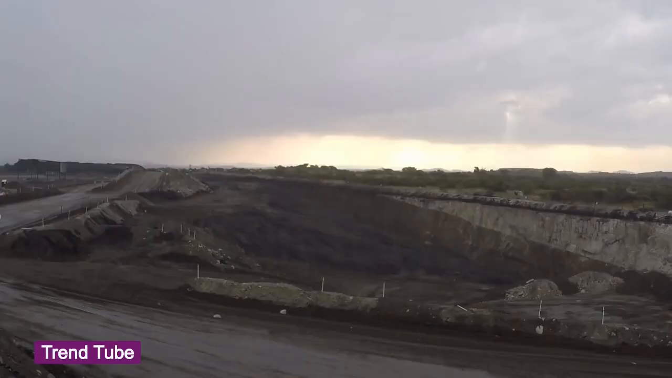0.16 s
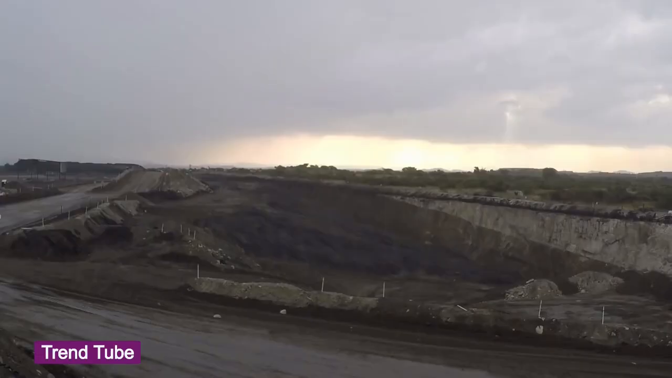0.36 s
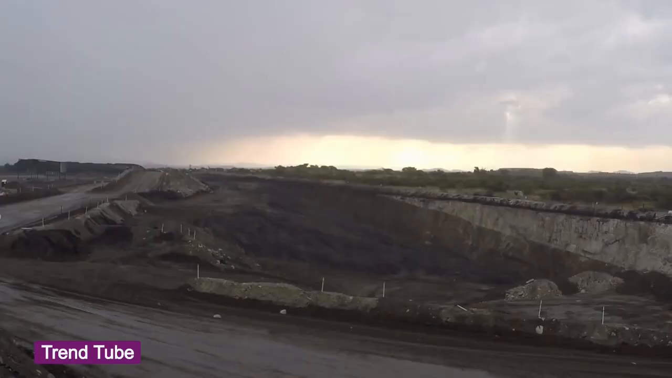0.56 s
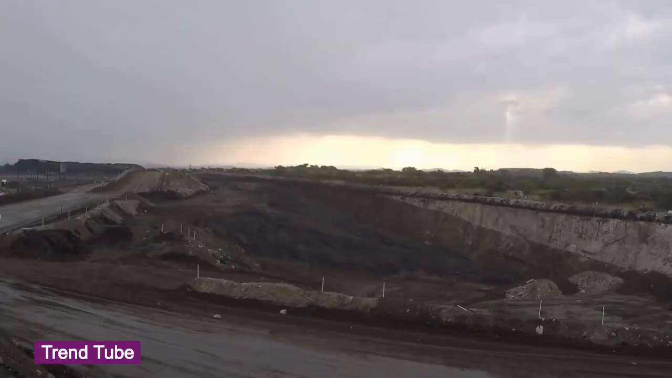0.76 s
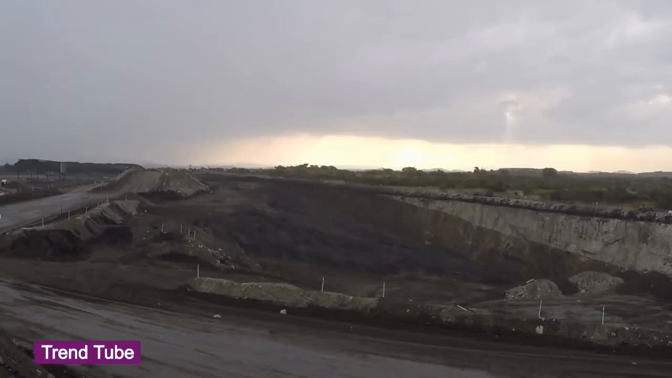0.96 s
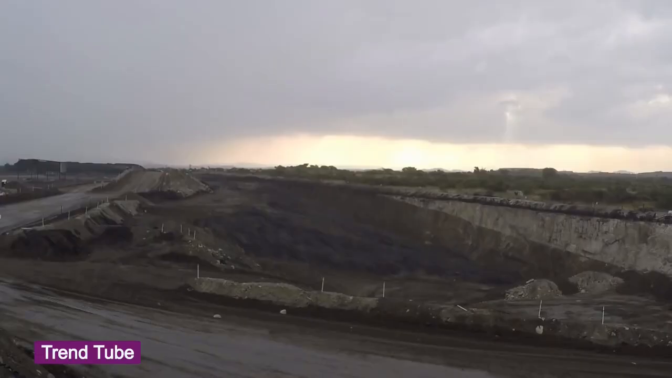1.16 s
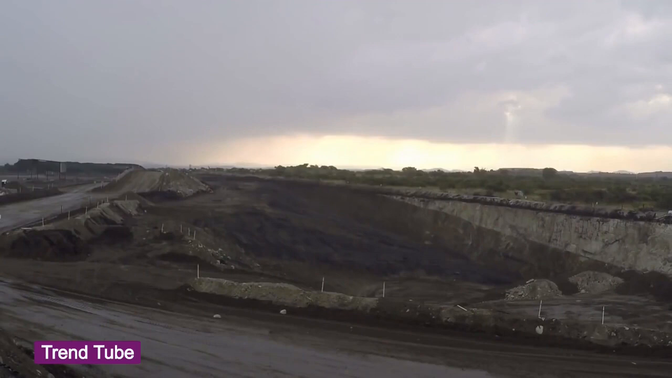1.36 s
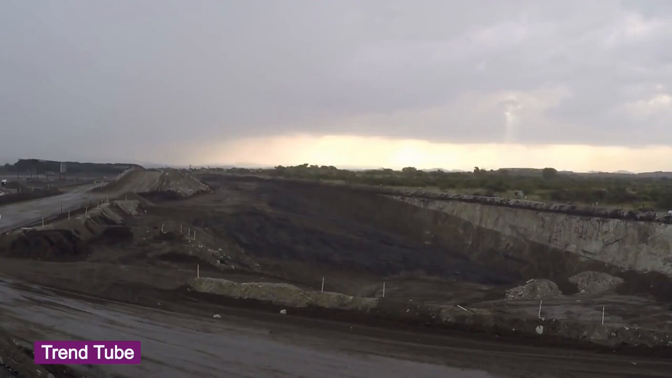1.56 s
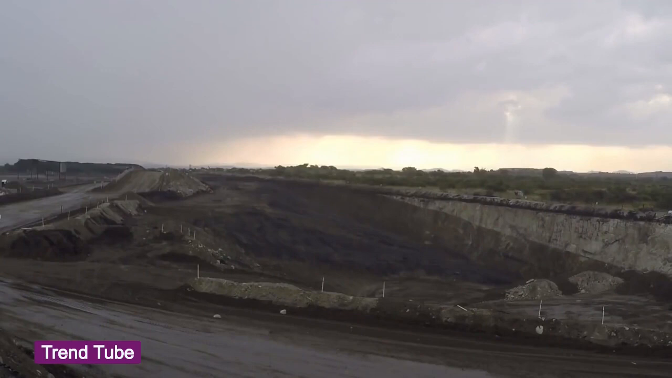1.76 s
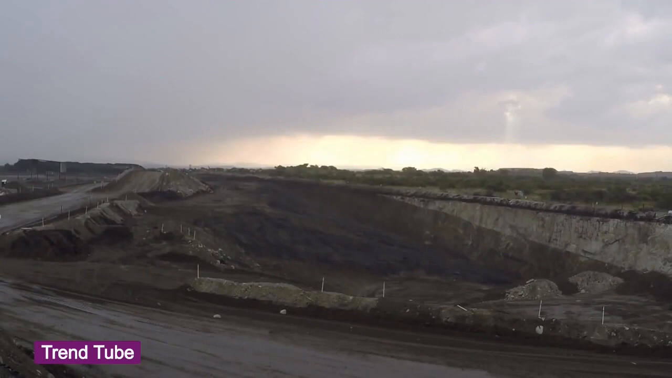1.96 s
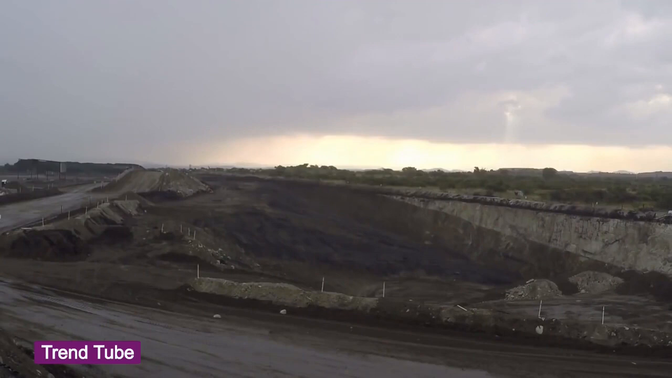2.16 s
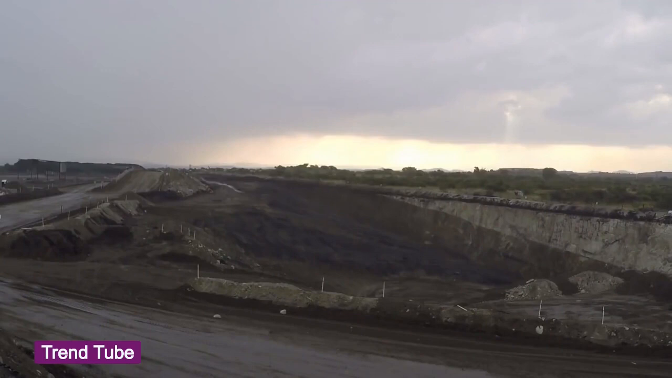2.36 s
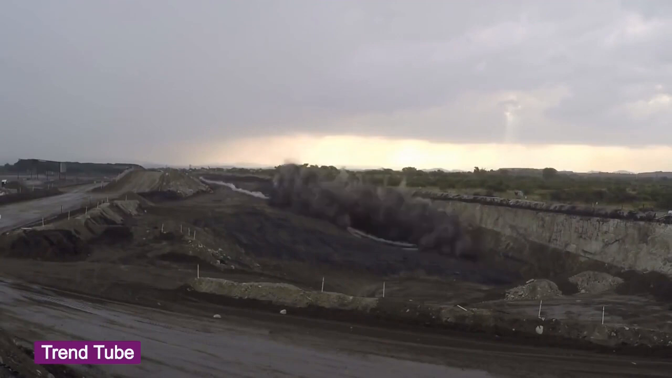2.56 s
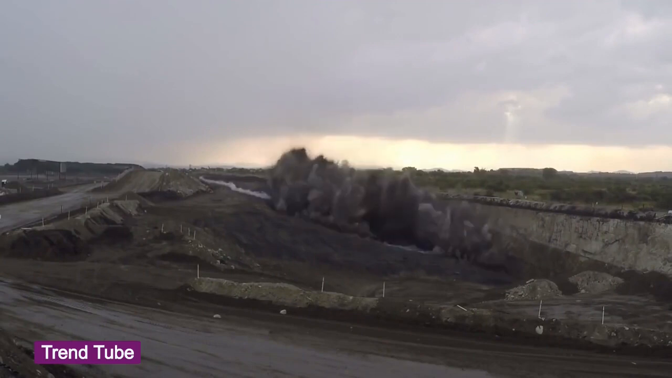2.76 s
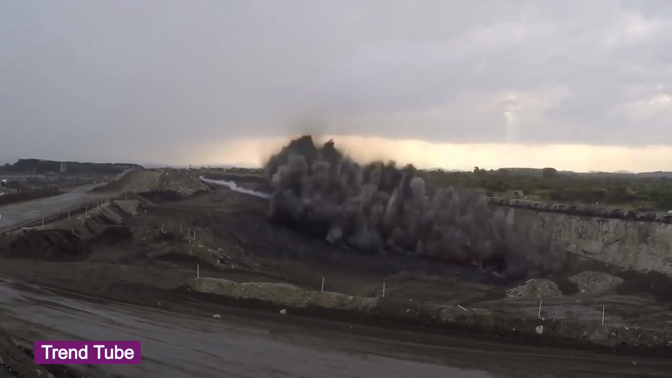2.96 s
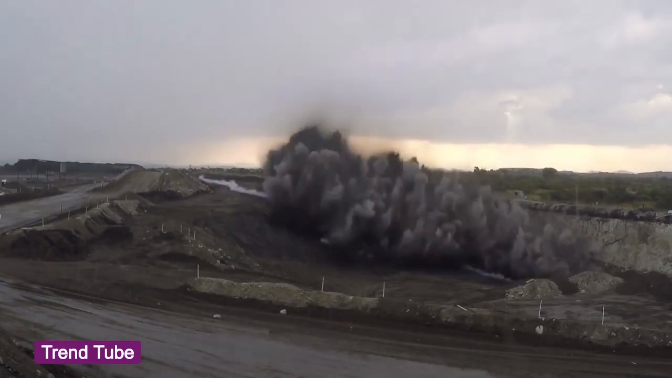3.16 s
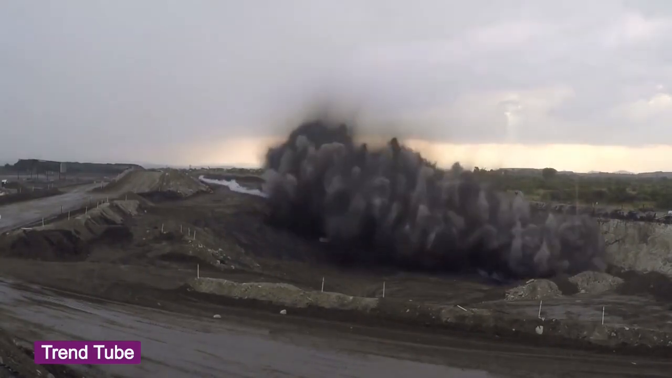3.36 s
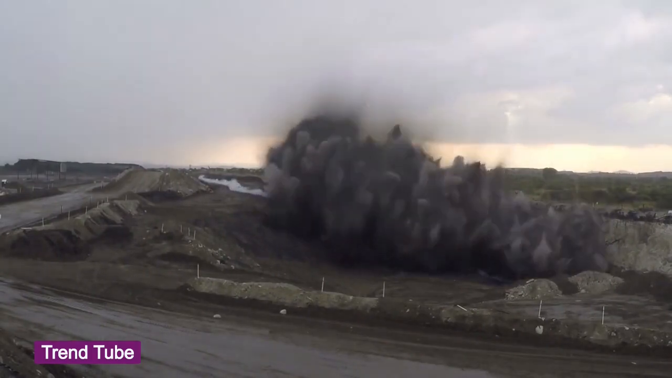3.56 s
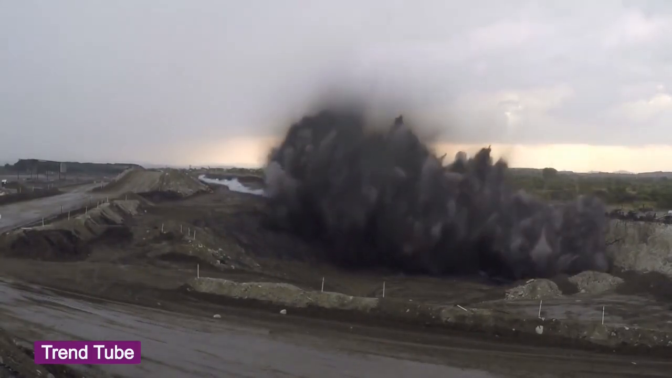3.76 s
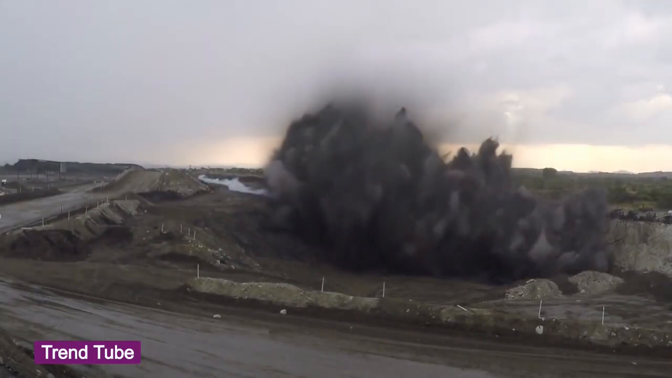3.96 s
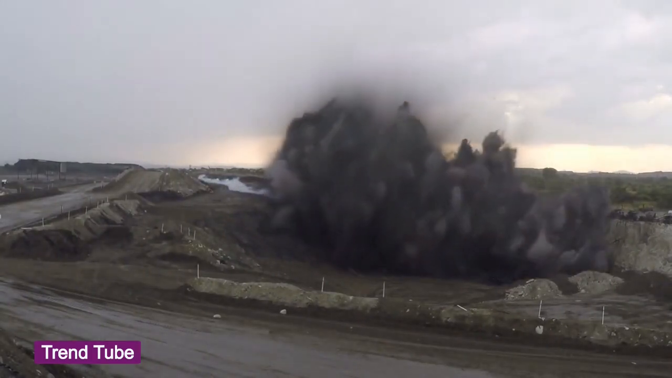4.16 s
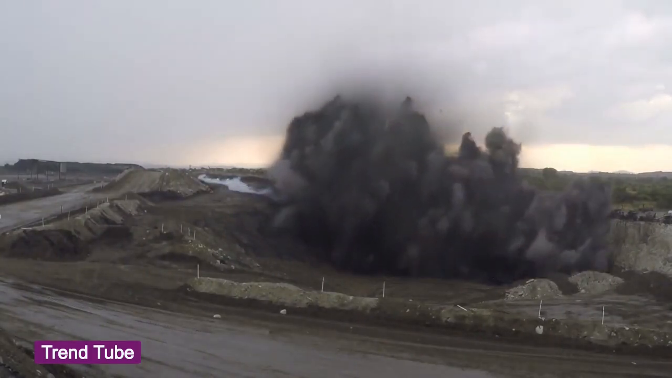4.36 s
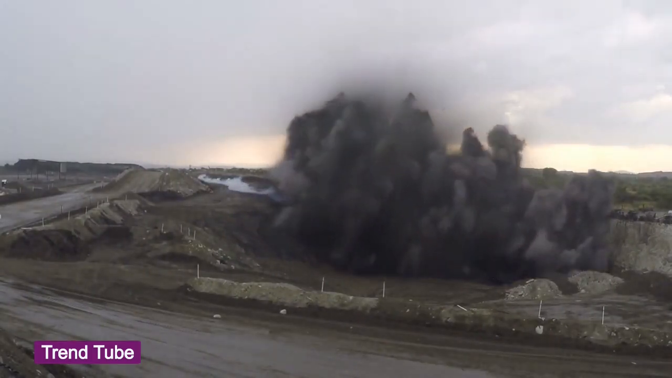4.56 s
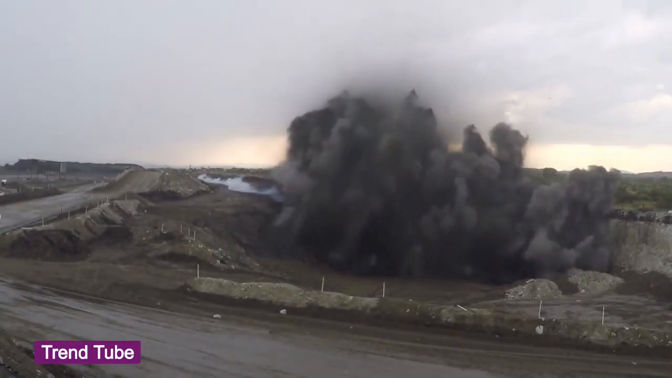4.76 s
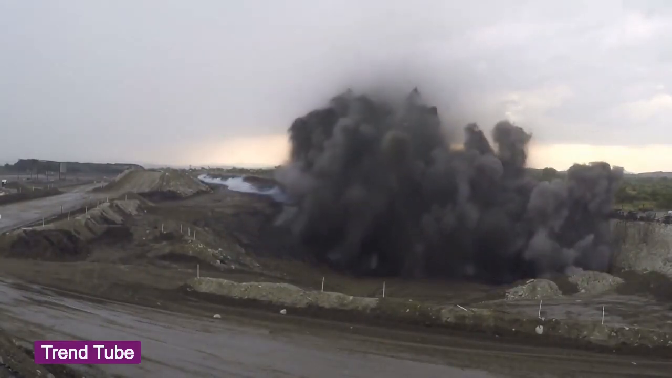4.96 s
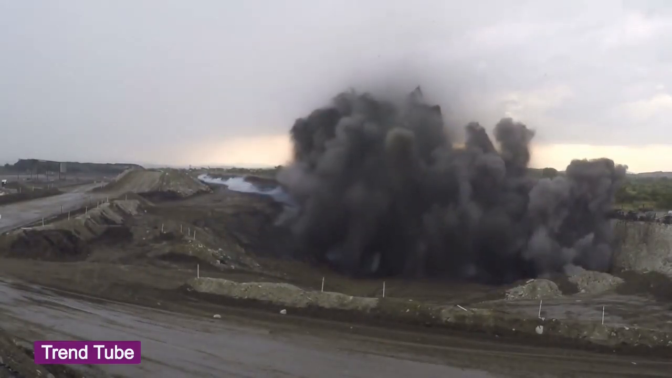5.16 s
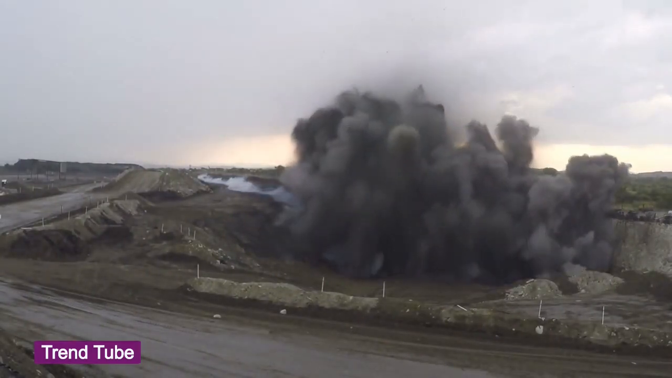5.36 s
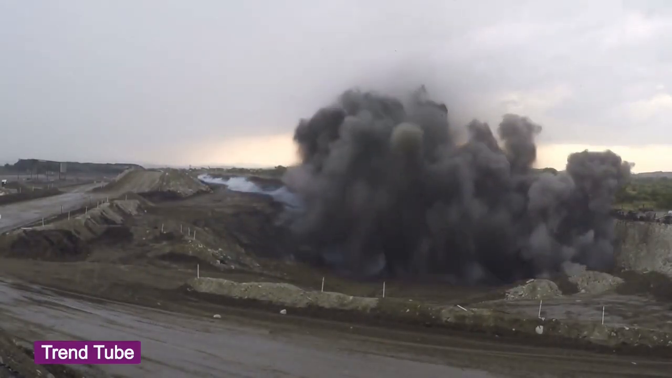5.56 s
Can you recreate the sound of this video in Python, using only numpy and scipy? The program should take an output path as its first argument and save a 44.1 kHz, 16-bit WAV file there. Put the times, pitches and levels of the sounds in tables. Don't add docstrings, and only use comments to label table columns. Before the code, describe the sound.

Quiet rain and plasticky drops, a sudden overloaded explosion chopped short, muffled rumble and rockfall, a hard housing rattle, then sparse drops.

```python
import sys
import numpy as np
from scipy import signal
from scipy.fft import rfft, irfft
from scipy.io import wavfile
from scipy.ndimage import uniform_filter1d

SR = 44100
rng = np.random.default_rng(int(sys.argv[2]) if len(sys.argv) > 2 else 0)


def makeup_ratio(level_db):
    decades = np.asarray(level_db, float) / 20
    return 10 ** decades


def master_out(mix):
    frames = np.transpose(np.atleast_2d(mix))
    ceiling = np.clip(frames, -1, 1)
    pcm = np.round(ceiling * 32767).astype(np.int16)
    wavfile.write(sys.argv[1], SR, pcm)


N = 247401

CUT_S = 2.5958
AIR_S, LOWEST_S = 3.08, 4.42
# (frequency [Hz], width [Hz], level [dB])
HOUSING = [(985, 150, -3), (1150, 200, -7.5), (1466, 210, -2.5), (1850, 128, -7), (2130, 170, -5.5),
           (2555, 157, 2.5), (2891, 190, 1.5), (3630, 120, 1), (4160, 180, -8.5), (4705, 224, -5.5),
           (5700, 330, -14), (6880, 500, -9), (8770, 760, -26)]
# (time [s], drive over input limit [dB], brightness [0-1], limit [dB])
BANG = [
    (2.355, -38.5, 0.8, -11.5),
    (2.383, -20.5, 0.45, -9.5),
    (2.3875, -4.5, 0.35, -8),
    (2.398, 7.5, 0.33, -10),
    (2.412, 12.5, 0.45, -11),
    (2.43, 9.5, 0.56, -9.5),
    (2.48, -0.5, 0.9, -10.5),
    (2.54, -8.5, 0.94, -8.5),
    (2.596, -14, 0.98, -7),
]
# (time [s], level [dB], snap re knock [dB])
RATTLE = [(3.0826, -12, -7), (3.0879, -13, -6), (3.0976, -19, -7), (3.1036, -14, -18), (3.1082, -25, -12),
          (3.1121, -31, -8), (3.1182, -30, -11), (3.1241, -18, -14), (3.1278, -23, -7), (3.1395, -14, -8),
          (3.1549, -16, -11), (3.1599, -16, -10), (3.164, -18, -15), (3.1728, -37, -5), (3.1809, -21, -10),
          (3.1836, -22, -13), (3.2033, -24, -10), (3.2072, -22, -11), (3.2148, -27, -11),
          (3.2192, -14, -11), (3.226, -29, -15), (3.2324, -31, -10), (3.2477, -36, -9), (3.2616, -21, -15),
          (3.2644, -22, -11), (3.2695, -23, -10), (3.2789, -18, -11), (3.2861, -27, -6), (3.296, -16, -10),
          (3.3001, -33, -4), (3.3032, -32, -11), (3.3234, -23, -9), (3.3386, -21, -9), (3.3555, -20, -10),
          (3.362, -24, -8), (3.376, -29, -14), (3.3804, -22, -11), (3.4058, -27, -9), (3.4095, -27, -7),
          (3.4131, -19, -10), (3.4178, -26, -11), (3.4325, -31, -8), (3.4378, -37, -8), (3.4458, -35, -5),
          (3.4541, -30, -7), (3.4693, -27, -12), (3.475, -26, -6), (3.4885, -17, -11), (3.4937, -28, -17),
          (3.5122, -30, -10), (3.5239, -23, -10), (3.5295, -16, -10), (3.5371, -33, -10),
          (3.5459, -23, -10), (3.5595, -35, -9), (3.5635, -34, -6), (3.569, -34, -8), (3.5826, -35, -9),
          (3.5901, -31, -12), (3.6032, -21, -13)]


def evened(x):
    return x / np.sqrt(np.mean(x ** 2) + 1e-20)


def read(points, hz):
    f, value = np.transpose(points)
    return np.interp(np.log(hz + 1), np.log(f + 1), value)


def curves(rows):
    s, *columns = np.transpose(rows)
    return [np.interp(np.arange(N) / SR, s, c) for c in columns]


def slow(shape):
    t = np.arange(0, N + 32, 32) / SR
    return np.interp(np.arange(N) / SR, t, shape(t))


def add(mix, s, sound):
    part = mix[round(s * SR):][:len(sound)]
    part += sound[:len(part)]


def colour(x, points):
    size = 2 ** 18
    gain = makeup_ratio(read(points, np.fft.rfftfreq(size, 1 / SR)))
    return evened(irfft(rfft(x, size) * gain)[:N])


def patchy(patch_db, flicker_db):
    a, b, patches = rng.standard_normal((N // 128 + 5, 257, 3)).T
    patches = uniform_filter1d(patches, size=6, axis=0)
    patches = evened(uniform_filter1d(patches, size=12, axis=1))
    flicker = rng.standard_normal(a.shape[1])
    z = (a + 1j * b) * makeup_ratio(patch_db * patches + flicker_db * flicker)
    return evened(signal.istft(z, nperseg=512, noverlap=384)[1][:N])


def grains(per_s, spread_db):
    size = makeup_ratio(spread_db * np.minimum(rng.exponential(1, N), 4))
    return rng.standard_normal(N) * size * (rng.random(N) < per_s / SR)


def resonate(x, hz, width):
    turn = np.exp(2j * np.pi * np.cumsum(hz * np.ones(len(x))) / SR)
    r = np.exp(-np.pi * width / SR)
    return 2 * (turn * signal.lfilter([1 - r], [1, -r], x / turn)).real


def resonate_twice(x, hz, width):
    return resonate(resonate(x, hz, width), hz, width)


def rain():
    # (frequency [Hz], density [dB per Hz])
    wash_spectrum = [(15, -37), (25, 0.5), (76, -10.5), (217, -7), (301, -8), (416, -2.5), (1040, -5.5),
                     (1290, -4.5), (1400, -6.5), (1650, -6), (2840, -12.5), (6740, -20.5), (13600, -36.5),
                     (16000, -45.5)]
    # (time [s], level [dB])
    rain_level = [(0.0, -41), (2.24, -41), (2.37, -41)]
    # (frequency [Hz], side minus mid [dB])
    side_spectrum = [(30, -19), (900, -46), (3500, -40), (4300, -31.5), (7000, -31.5), (9000, -22),
                     (13000, -9), (16000, -4)]
    # (time [s], peak [dB], frequency [Hz])
    splashes = [(0.16, -28.5, 7360), (0.1894, -35, 6290), (0.3996, -30.5, 6300), (0.4668, -33.5, 7290),
                (0.5484, -33, 9200), (0.9522, -31, 7500), (1.0944, -36, 6640), (1.4074, -32.5, 6340),
                (1.5304, -35, 7250), (1.6844, -33, 7880), (1.7887, -27, 5960), (1.9444, -32.5, 7100),
                (2.2129, -33, 6070), (2.3105, -23.5, 6500), (2.3461, -32, 6760)]
    # (time [s], peak [dB], frequency [Hz], length [s])
    puffs = [
        (.57, -45, 135, .03),
        (.71, -43, 118, .035),
    ]
    # (frequency [Hz], level [dB], rate [beats per s], first beat [s])
    machine = (1298, -45, 6.24, .0723)

    wash = colour(patchy(1.5, 0.41), wash_spectrum)
    burst = np.exp(-np.arange(600) / 130) * rng.standard_normal(600)
    fine = signal.oaconvolve(grains(60, 4.), burst)[:N]
    spatter = colour(.5 * evened(fine) + patchy(5., 1.2),
                     [(2000, -32), (4500, -3.5), (8000, 7), (12000, -7), (16000, -6.5)])
    side = colour(patchy(4., 2.5), [(hz, read(wash_spectrum, hz) + db) for hz, db in side_spectrum])

    near = np.zeros(N)
    decay = np.exp(-np.arange(900) / 160)
    for (s, db, hz), noise in zip(splashes, rng.standard_normal((len(splashes), 900))):
        add(near, s, makeup_ratio(db - 10.0) * evened(resonate_twice(noise, hz, 4000)) * decay)
    t = np.arange(N) / SR
    for s, db, hz, length in puffs:
        near += makeup_ratio(db) * np.sin(2 * np.pi * hz * t) * np.exp(-((t - s) / length) ** 2)

    hz, db, per_s, first = machine
    beats = makeup_ratio(db) * np.sin(2 * np.pi * hz * t) * np.cos(np.pi * per_s * (t - first)) ** 10
    level = makeup_ratio(curves(rain_level)[0] + 0.62)
    return level * (wash + makeup_ratio(-22) * spatter + makeup_ratio(-29.0) * side * [[1], [-1]]) + near + beats


def tap(low_hz, high_hz, high_db, tick_db, focus, damp, scatter_db, chance):
    t = np.arange(2600)[:, None] / SR
    hz, width, db = np.transpose(HOUSING)
    count = len(hz)
    near = makeup_ratio(-focus * abs(np.log2(hz / low_hz))) + makeup_ratio(high_db - focus * abs(np.log2(hz / high_hz)))
    weight = near * makeup_ratio(.4 * db + scatter_db * chance[:count])
    long_gain = makeup_ratio(-23.5 - 8.8 * (hz > 3000) + 3.5 * chance[20:20 + count])
    decay = np.exp(-np.pi * damp * (width + 120) * t)
    decay = decay + long_gain * np.exp(-np.pi * .3 * (width + 80) * t)
    modes = (weight * decay * np.sin(2 * np.pi * hz * t + 1.654 * chance[-count:])).sum(1)

    t = t[:, 0]
    spot = np.sin(2 * np.pi * low_hz * t) + makeup_ratio(high_db) * np.sin(2 * np.pi * high_hz * t)
    modes += 0.97 * spot * np.exp(-t / 0.0019)
    modes += makeup_ratio(-9.0) * np.sin(2 * np.pi * 1050 * t) * np.exp(-t / 0.0018)
    lid = np.sin(2 * np.pi * 2740 * t) + 0.52 * np.sin(2 * np.pi * 1860 * t)
    modes += makeup_ratio(-22.5) * lid * np.exp(-t / 0.0089)

    tick = resonate(resonate(np.resize(chance, len(t)), 5000, 8000), 4700, 8200) * np.exp(-t / 0.001)
    blow = (modes / abs(modes).max() + makeup_ratio(tick_db) * tick) * np.minimum(t / 0.00051, 1)
    return signal.sosfilt(signal.butter(3, 420, "high", fs=SR, output="sos"), blow)


def drops():
    # (time [s], peak [dB], low ring [Hz], high ring [Hz], high ring re peak [dB])
    heavy = [(0.099, -10.5, 2000, 4090, -3.5), (0.985, -11.5, 1980, 2600, -3), (1.788, -25, 1320, 2930, 0),
             (1.84, -18, 1300, 2750, 1), (1.959, -7.5, 1918, 2400, -42), (2.091, 1, 2420, 3460, -13),
             (2.609, -12.5, 1810, 2400, -25), (2.619, -17.5, 1400, 2950, -23.5),
             (2.622, -15, 1120, 2390, -5), (2.683, -32, 1888, 2370, -36.5), (2.899, -1.5, 2820, 3760, -3),
             (3.953, -32.5, 2197, 2400, -31), (4.121, -21, 1990, 2695, -6), (4.459, -25, 2130, 2850, -23),
             (4.57, -13.5, 1880, 3920, -2), (4.677, -32, 2260, 2775, -20),
             (5.064, -32.5, 2020, 2840, -15.5), (5.136, -10, 1920, 2540, -26),
             (5.199, -20.5, 1716, 2760, -48), (5.5, -9.5, 1150, 2676, 9.5), (5.507, -20.5, 2330, 4000, -1),
             (5.579, -23.5, 2303, 2816, -13)]
    # (time [s], peak [dB], ring [Hz], tick re peak [dB])
    light = [(1.26, -28, 3700, -23), (2.651, -48, 955, -33), (2.744, -44, 790, -22),
             (2.759, -42.5, 804, -26.5), (2.772, -41, 850, -21.5), (2.98, -38.5, 1240, -33.5),
             (3.961, -38.5, 1859, -19.5), (4.176, -39.5, 2173, -29), (4.27, -53, 1722, -3),
             (4.344, -47.5, 1184, -13), (4.393, -37, 1886, -15), (4.448, -43, 3630, -26),
             (4.486, -37.5, 1940, -37), (4.763, -44, 2280, -34), (4.952, -40, 915, -30),
             (5.151, -34, 1900, -21), (5.215, -42, 1761, -33), (5.372, -37, 1890, -32),
             (5.483, -41, 2950, -25)]
    # (time [s], peak [dB], frequency [Hz], t60 [s])
    drips = [(2.804, -48, 531, 0.066), (2.801, -55.5, 1850, 0.038), (2.846, -58.5, 1850, 0.028),
             (2.877, -53, 927.6, 0.055), (3.003, -50, 538, .07), (3.002, -63, 1654, 0.0386),
             (3.04, -60, 1754, 0.042), (3.742, -44.5, 1564, 0.0254), (4.535, -63, 530, 0.064),
             (4.955, -57, 895, 0.093), (5.02, -53, 1920, 0.0266), (5.114, -48.5, 910, 0.018),
             (5.228, -55, 1490, 0.035), (5.35, -43, 1150, 0.02), (5.367, -47.5, 688, 0.0218),
             (5.562, -51.5, 1808, .04)]
    heavy_tick_db, light_high_hz, light_high_db = -26, 2760, -13.5

    out, t = np.zeros(N), np.arange(4000) / SR
    rows = [(*row, heavy_tick_db) for row in heavy]
    rows += [(s, db, hz, light_high_hz, light_high_db, tick_db) for s, db, hz, tick_db in light]
    for (s, db, low_hz, high_hz, high_db, tick_db), chance in zip(rows, rng.standard_normal((len(rows), 200))):
        blow = tap(low_hz, high_hz, high_db + 4.5, tick_db + 4, 10.0, 1.13, 0.38, chance)
        add(out, s + 0.00051, makeup_ratio(db) * blow)
    for (s, db, hz, t60), noise in zip(drips, rng.standard_normal((len(drips), len(t)))):
        hum = np.sin(2 * np.pi * hz * t) + 0.9 * evened(resonate_twice(noise, hz, .3 * hz))
        add(out, s, makeup_ratio(db - 60 * t / t60) * hum * np.minimum(t / 0.0013, 1))
    return out


def bang():
    # (frequency [Hz], density [dB per Hz])
    dull_spectrum = [(60, -25), (200, -17.5), (390, 6), (700, -9), (1400, -3), (3000, -22.5), (8000, -31),
                     (16000, -37.5)]
    bright_spectrum = [(35, -68), (60, -45), (238, -21), (389, -3.5), (579, -6), (842, -0.5), (1170, -11.5),
                       (1550, -4.5), (6740, -11.5), (10500, -25), (16000, -40)]
    # (time [s], strength over input limit [dB], length [ms])
    shocks = [
        (2.384, 8.5, .8),
        (2.3867, 6.5, .6),
        (2.3887, 7.5, .7),
        (2.3915, 7.5, .9),
        (2.394, 8.5, .8),
        (2.3954, 12, .9),
    ]

    now = np.arange(N) / SR
    drive_db, bright, limit_db = curves(BANG)
    bright = np.clip(bright, 0, 1)
    roar = (1 - bright) * colour(patchy(1.8, 2.0), dull_spectrum)
    roar = roar + bright * colour(patchy(1.4, 1.5), bright_spectrum)
    roar *= makeup_ratio(drive_db) / np.hypot(bright, 1 - bright) * (np.arange(N) > BANG[0][0] * SR)
    t = np.arange(-20, 400) / SR
    for s, db, ms in shocks:
        pulse = (1 - 300 * t / ms) * np.exp(-1000 * t / ms)
        add(roar, s + t[0], makeup_ratio(db) * np.where(t < 0, -.6, pulse))

    apart = colour(rng.standard_normal(N),
                   [(100, 5), (1000, -1), (2200, -5), (4500, 2), (7000, -0.5), (14000, -4)])
    apart *= makeup_ratio(-22) * np.exp(-np.maximum(now - shocks[0][0], 0) / .02) * np.minimum(makeup_ratio(drive_db), 1)
    flat = np.tanh(roar) + apart * [[1], [-1]]

    dark = np.interp(now, (2.49, 2.535, 2.565, 2.59), [0, 1, 1, .8])
    low_pass = signal.butter(14, 13400, fs=SR, output="sos")
    flat = (1 - dark) * flat + dark * signal.sosfiltfilt(low_pass, flat)
    droop = np.exp(-2 * np.pi * 25 / SR)
    return makeup_ratio(limit_db) * signal.lfilter([1, -1], [1, -droop], flat)


def aftermath():
    # (at cut [dB], lull [dB], shaking [dB], fading [dB per s], at lowest gain [dB])
    layers = [
        (-43.5, -77.5, -42, 45, -73.5),
        (-63, -98, -61, 84, -97),
        (-53, -66.5, -45.5, 76, -87),
        (-53.5, -62, -52, 35.5, -80),
    ]
    creep = [18.7, 20, 14, 8.5]
    follow = [0.37, 0.38, 0.55, 0.227]
    still_s, cut_tail_s, shake_s = 3.58, 0.044, 0.016

    t = np.arange(N) / SR
    knocks = slow(lambda u: sum(makeup_ratio(2 * db) * (u > s) * np.exp(-abs(u - s) / shake_s) for s, db, _ in RATTLE))
    shake_db = np.where(t < still_s, 10 * np.log10(knocks + 0.00026) + 25, 0)
    for (cut_db, lull_db, top_db, fade_db, low_db), creep_db, share in zip(layers, creep, follow):
        lull = makeup_ratio(lull_db) + makeup_ratio(cut_db - 30 * (t - CUT_S) / cut_tail_s)
        blast = makeup_ratio(top_db + share * shake_db - fade_db * np.maximum(t - still_s, 0))
        blast = blast + makeup_ratio(low_db + creep_db * (t - LOWEST_S))
        yield np.where(t < AIR_S, lull, blast) * (t > CUT_S)


def fall():
    # (frequency [Hz], density [dB per Hz])
    rock_spectrum = [(130, -46.5), (220, -5.5), (477, -3.5), (712, -8), (903, -4.5), (1150, -34),
                     (1300, -37), (1690, -50), (2860, -120)]

    grit_gain, treble_gain, rock_gain, deep_gain = aftermath()
    t = np.arange(N) / SR
    shaking = np.interp(t, [3.6, 3.75], [.6, .15])
    drive = (patchy(0.89, 1.6) + shaking * evened(grains(370, 1.3))) / np.hypot(1, shaking)
    dull = colour(patchy(5., 4.1), [(2500, -5.5), (3500, -18), (16000, -28)])
    murmur = np.where(t < AIR_S, dull, drive)
    echo_db = np.interp(t, [3.55, 3.7, 4.15, 4.3], [11.0, 12.5, 4, 1.8])
    far_db = 4. * np.clip(t - LOWEST_S, 0, 1)
    grit = 0
    for k, (hz, width, db) in enumerate(HOUSING[:11]):
        ring = resonate(resonate(murmur, hz, 2.2 * width), hz, 4.3 * width)
        mode_db = db + echo_db * (1700 < hz < 2000) + far_db * (hz > 3000)
        grit = grit + (-1) ** k * makeup_ratio(mode_db) * ring

    treble = colour(drive, [(3000, -26), (5500, 7.5), (8000, 2.5), (11000, -14), (14000, -21), (16500, -38)])
    settled = np.interp(t, (3.62, 3.74), [0, 1])
    low_pass = signal.butter(6, 9500, fs=SR, output="sos")
    treble = (1 - settled) * treble + settled * signal.sosfilt(low_pass, treble)
    rock = colour(patchy(2.6, 3.0), rock_spectrum)
    deep = colour(patchy(3., 3.), [(60, -28), (100, 4.0), (170, -5), (260, -9.5), (400, -43.5)])
    return grit_gain * evened(grit) + treble_gain * treble + rock_gain * rock + deep_gain * deep


def ground():
    # (time [s], low [Hz], middle [Hz], upper [Hz])
    pitch = [(2.7, 22, 43.9, 72.44), (2.901, 22.9, 43.5, 75.86), (3.002, 22.16, 53.83, 73.2),
             (3.101, 25.48, 52, 75.8), (3.202, 29.78, 48.7, 79.7), (3.45, 24.4, 54.82, 79.9),
             (3.602, 24.92, 54.87, 82.2), (4.0, 28.07, 50.6, 77.2), (5.6, 27.1, 51.63, 76)]
    # (time [s], peak [dB], time to fall by fall_db [s])
    wave_swells = [
        [(2.73, -37.5, 0.32), (3.11, -30.5, 0.08), (3.18, -27.5, 0.04), (3.43, -31, 0.04), (3.55, -29.5, 0.03),
         (3.64, -37, 0.05), (3.83, -44.5, 0), (4.01, -45.5, .1), (4.22, -51.5, 0.2), (5.3, -54.5, 0.4)],
        [(2.74, -27, 0.19), (2.88, -28, 0.04), (3.12, -22, .06), (3.22, -26.5, 0.04), (3.34, -27, .07),
         (3.47, -29.5, 0.11), (3.57, -31, .07), (3.71, -40.5, .1), (3.88, -48.5, 0.1838), (4.16, -49, 0.1),
         (4.66, -57.5, .1), (5.31, -56.5, 0.3), (5.57, -52.5, 0.18)],
        [(2.725, -23.5, 0.0876), (2.96, -38.5, 0.14), (3.11, -27, .03), (3.22, -34, .04), (3.43, -47, .1),
         (3.56, -37.5, 0.09), (5.3, -59, 0.2)],
    ]
    # (while shaking [dB], fading [dB per s], lasting [dB])
    coda = [
        (-45, 22, -62.5),
        (-44, 33, -65),
        (-49, 40, -73),
    ]
    fall_db, rise_share = 11.5, .6
    first_s, rise_s, coda_s = 2.7, 0.028, 3.59

    def swell_power(u, swells):
        total = 0
        for s, db, fall_s in swells:
            away_s = np.maximum(u - s, (s - u) / rise_share)
            total = total + makeup_ratio(2 * (db - fall_db * away_s / fall_s))
        return total

    t = np.arange(N) / SR
    out = np.zeros(N)
    scatter = np.interp(t, [2.8, 3.1, 3.8], [.1, .3, .7])
    for swells, (top_db, fade_db, last_db), hz, width in zip(wave_swells, coda, curves(pitch), (14, 16, 22)):
        power = makeup_ratio(2 * (top_db - fade_db * np.maximum(t - coda_s, 0))) + makeup_ratio(2 * last_db)
        power += slow(lambda u: swell_power(u, swells))
        blur = evened(resonate_twice(rng.standard_normal(N), hz, width))
        wander = uniform_filter1d(rng.standard_normal(N), size=3000)
        wander = evened(uniform_filter1d(wander, size=3000))
        phase = 2 * np.pi * np.cumsum(hz * (1 + 0.1538 * scatter * wander)) / SR
        tone = np.sqrt(2) * np.sin(phase)
        out += np.sqrt(power) * (tone + scatter * blur) / np.hypot(1, scatter)
    return out * np.clip((t - first_s) / rise_s + 1, 0, 1) ** 2


def rattle():
    # (time [s], level [dB], snap re knock [dB])
    late_knocks = [
        (3.655, -48, -6),
        (3.677, -52, -6),
        (3.703, -50, -5),
    ]
    # (frequency [Hz], level [dB], decay [ms])
    mount = [(470, -9, 1.5), (900, -8, 1.8), (1500, -7, 1.2), (1750, -6, 1.2), (2020, -8, 1.3),
             (2560, 1, 1.9), (2860, 1, 1.5), (3600, 0, 1.7), (4120, -4, 1.6), (4480, 1, 1.4),
             (4780, -7, 1.3), (5750, -6, 1.2), (6700, -11, 0.7)]
    echo_ms, echo_share = .9, .8

    out, t = np.zeros(N), np.arange(900) / SR
    hz, level_db, ms = np.transpose(mount)[:, :, None]
    u = t / .001
    knocks = RATTLE + late_knocks
    for (s, db, snap_db), chance in zip(knocks, rng.standard_normal((len(knocks), 260))):
        a, b = chance[:len(hz), None], chance[-len(hz):, None]
        modes = makeup_ratio(level_db + 2.5 * a) * np.sin(2 * np.pi * hz * t + .35 * b) * np.exp(-1000 * t / ms)
        ring = -modes.sum(0)
        ring -= echo_share * np.interp(t - echo_ms / 1000, t, ring, left=0)
        snap = resonate_twice(np.resize(chance, len(t)), 6500, 9000) * np.exp(-t / .0008)
        knock = (ring / abs(ring).max() + makeup_ratio(snap_db - 7.) * snap) * np.minimum(t / .0002, 1)
        push = u * (u - 1.4) * np.exp(-u)
        add(out, s - .0006, makeup_ratio(db + 5.5) * knock + makeup_ratio(db - 1.5) * push)
    return out


def scene():
    tap_limit = 0.1612
    before = np.arange(N) < CUT_S * SR
    banging = np.arange(N) > BANG[0][0] * SR
    ducked = 1 / np.sqrt(1 + makeup_ratio(2 * curves(BANG)[0] + 15) * banging)
    close = ~before * (ground() + fall()) + drops() + rattle()
    close /= (1 + (close / tap_limit) ** 10) ** (1 / 10)
    return before * (ducked * rain() + bang()) + close


def band_limit(x):
    return signal.sosfilt(signal.butter(12, 16850, fs=SR, output="sos"), x)


def record(dry):
    input_offset = [-.0143, .02]
    offset = np.array(input_offset)[:, None] * (np.arange(N) < CUT_S * SR)
    edge = signal.firwin(255, 15900, window=("kaiser", 8), fs=SR)
    return band_limit(signal.oaconvolve(dry, edge[None], "same") + offset)


dry = scene()
out = record(dry)
master_out(out)
```